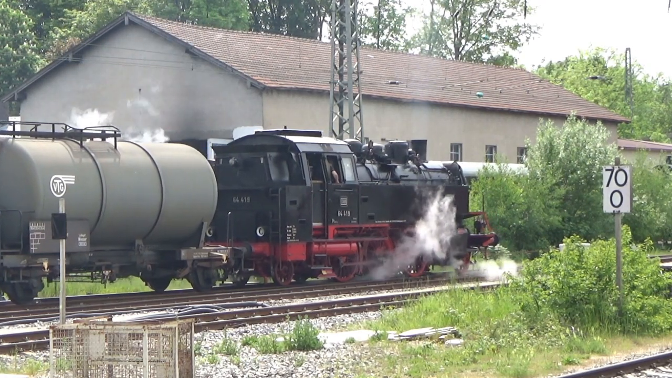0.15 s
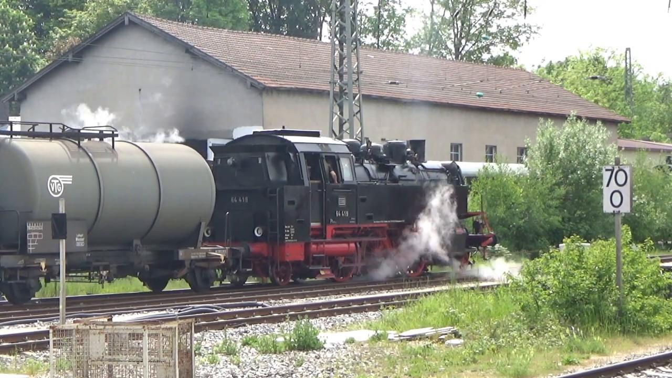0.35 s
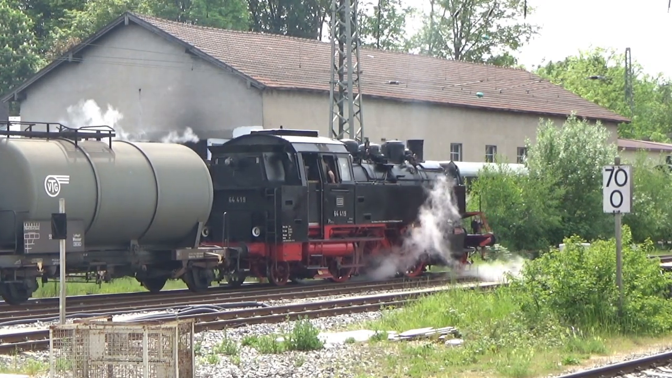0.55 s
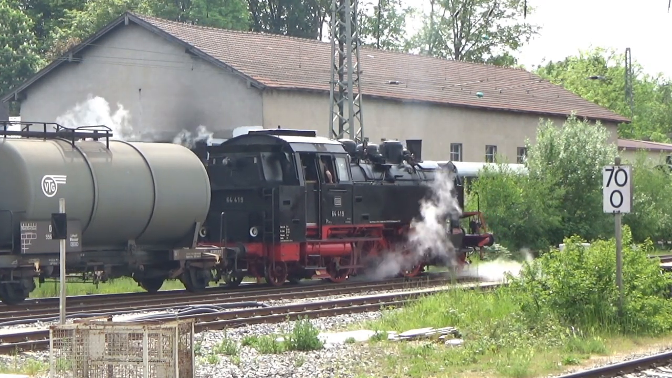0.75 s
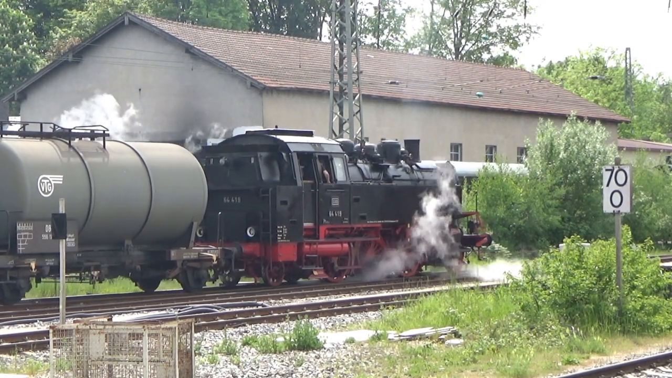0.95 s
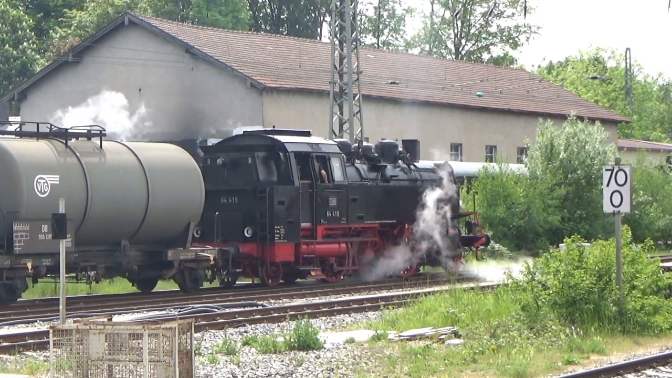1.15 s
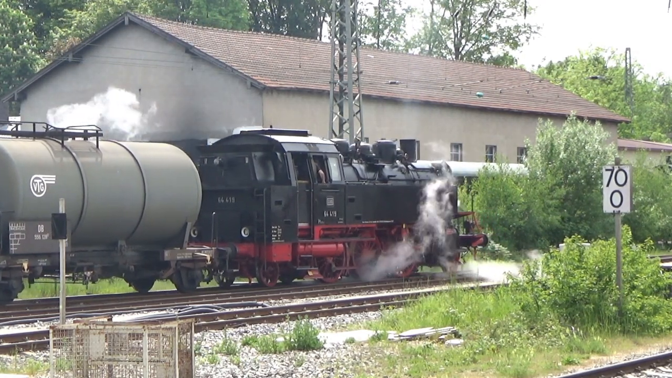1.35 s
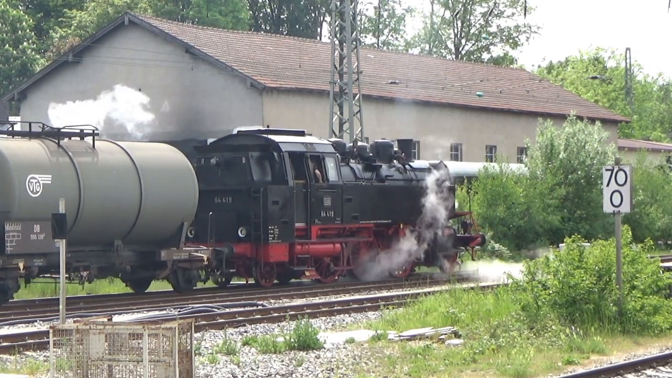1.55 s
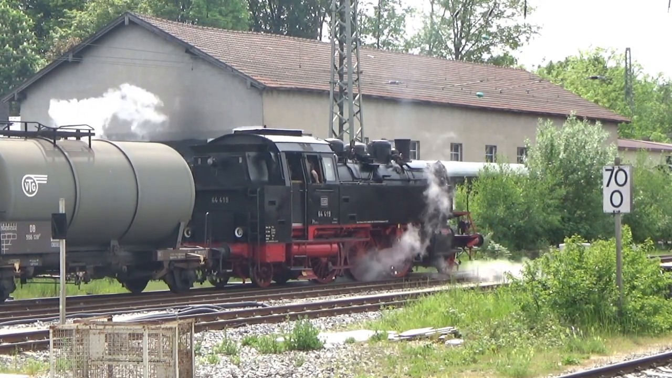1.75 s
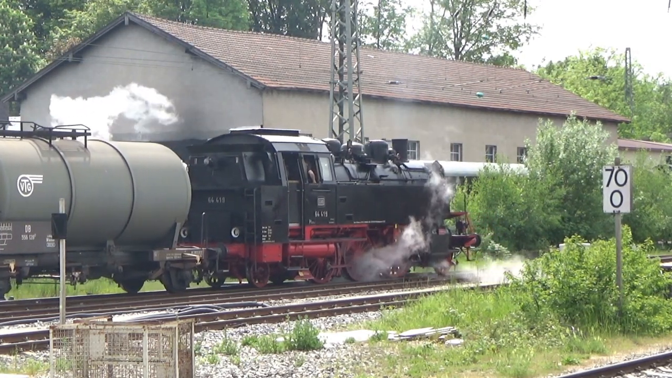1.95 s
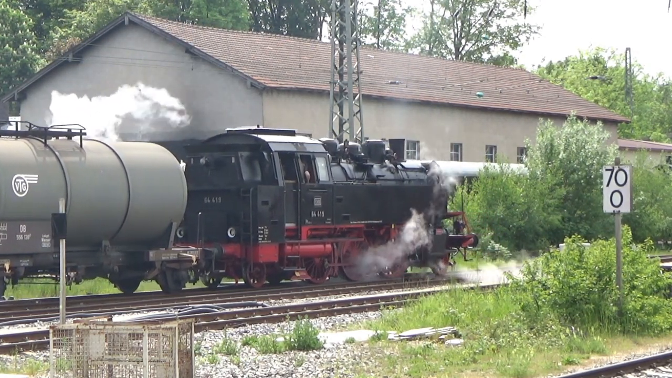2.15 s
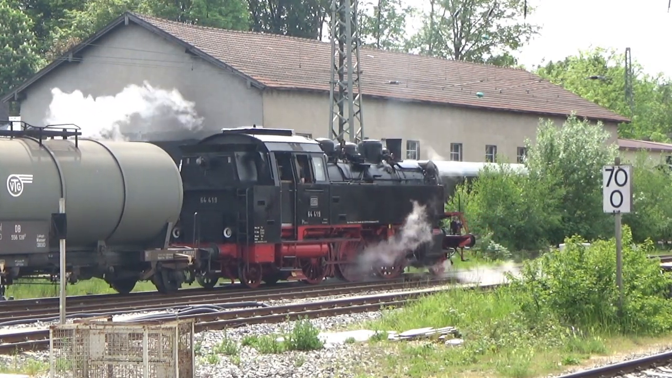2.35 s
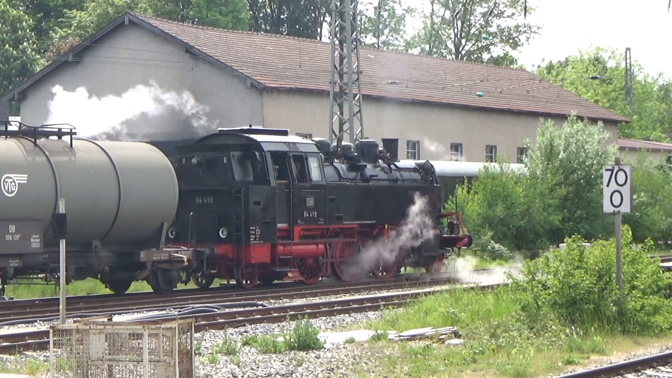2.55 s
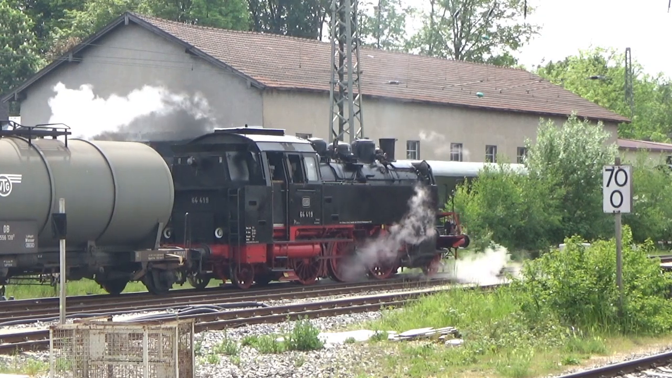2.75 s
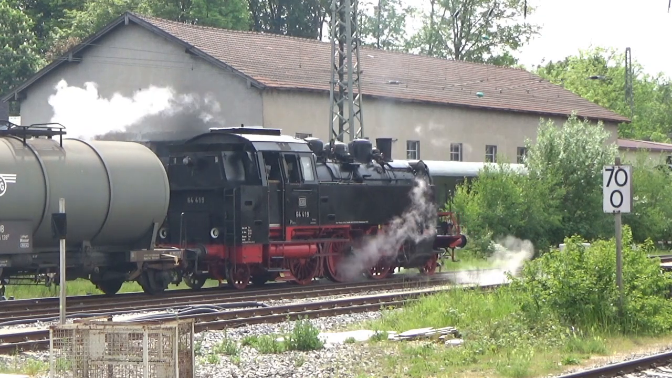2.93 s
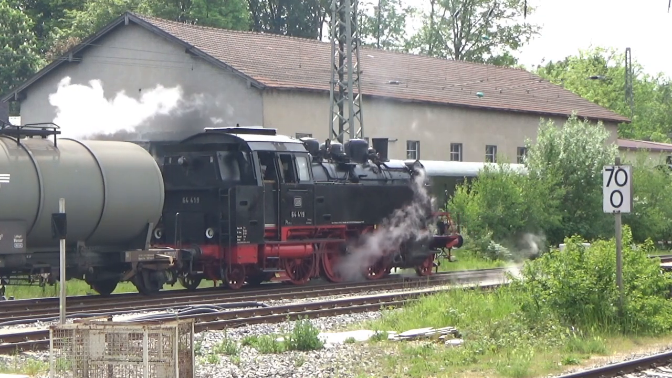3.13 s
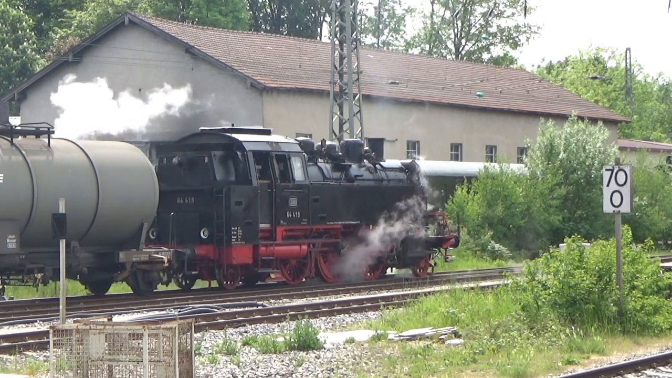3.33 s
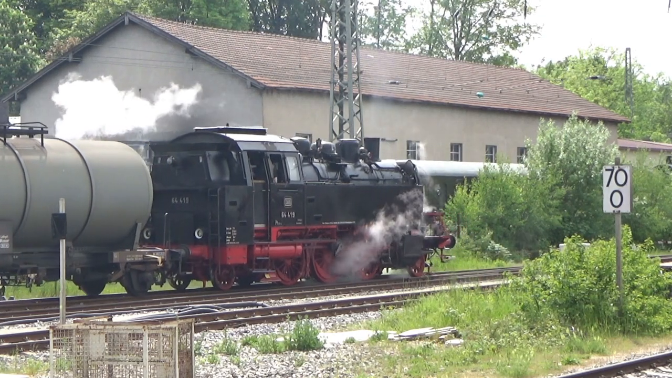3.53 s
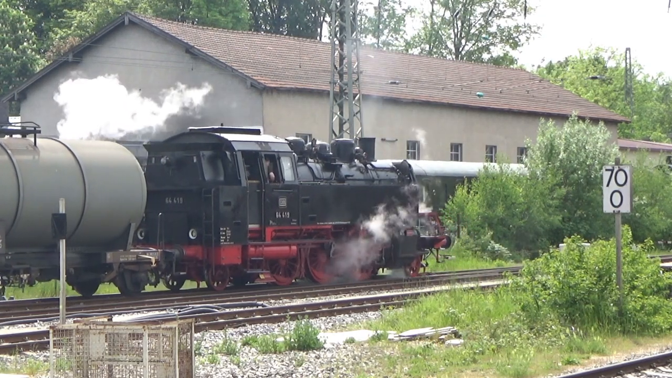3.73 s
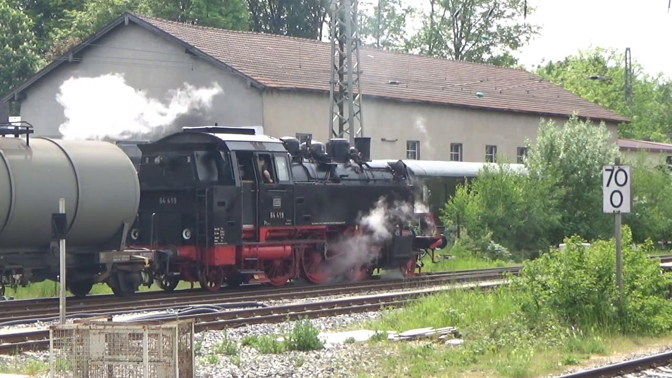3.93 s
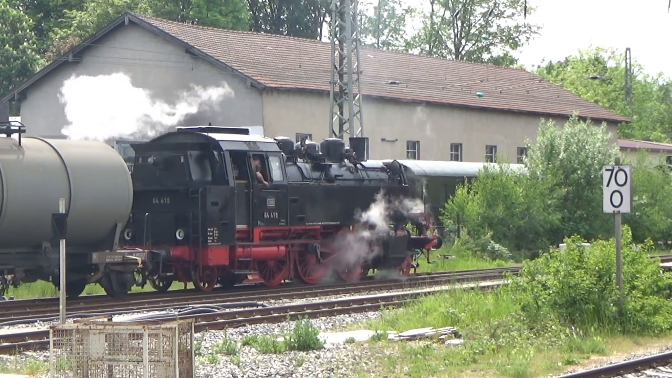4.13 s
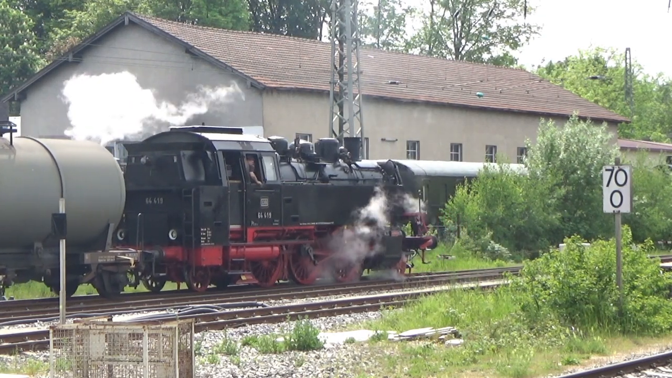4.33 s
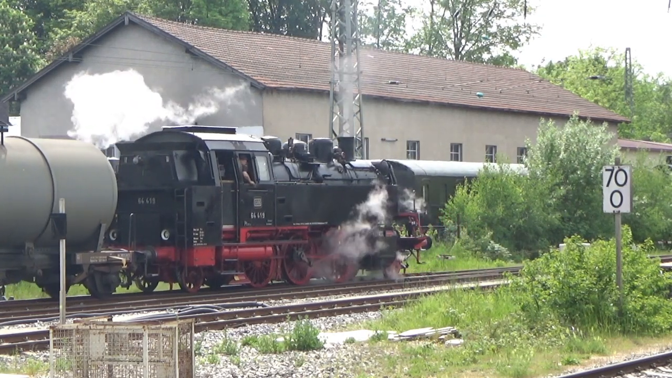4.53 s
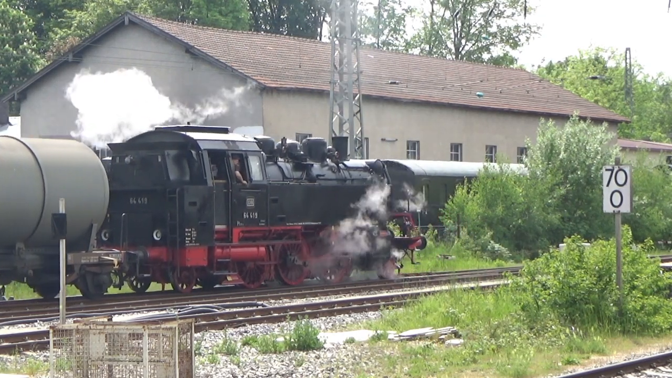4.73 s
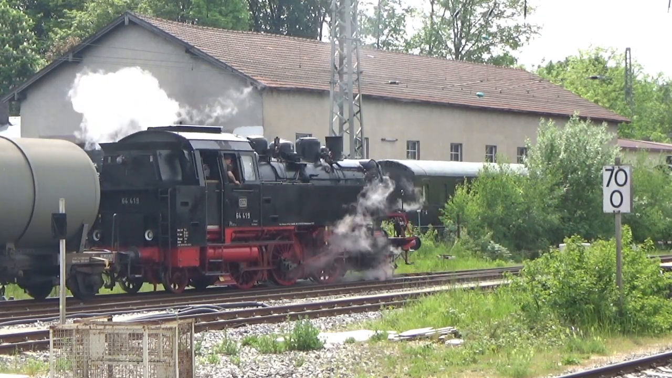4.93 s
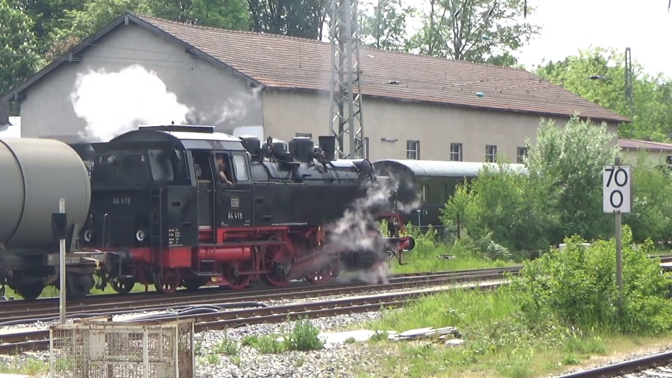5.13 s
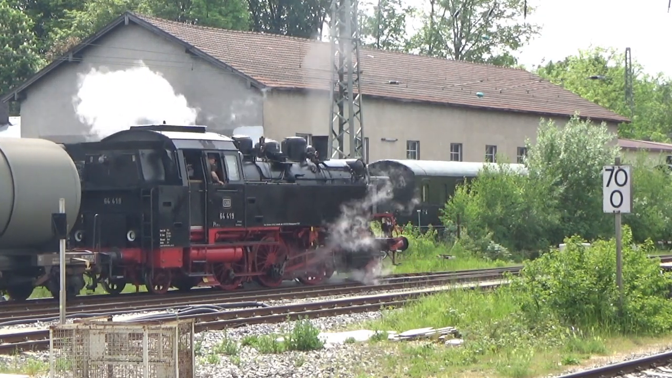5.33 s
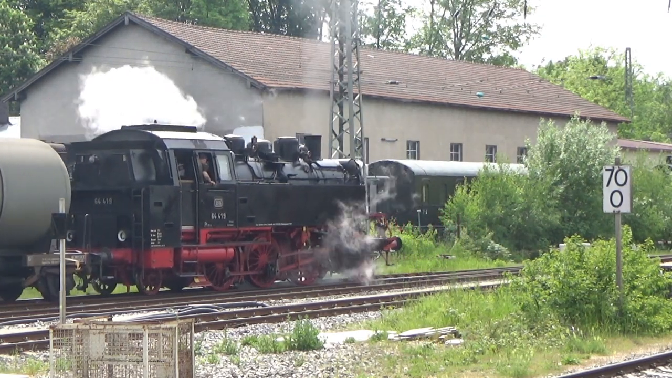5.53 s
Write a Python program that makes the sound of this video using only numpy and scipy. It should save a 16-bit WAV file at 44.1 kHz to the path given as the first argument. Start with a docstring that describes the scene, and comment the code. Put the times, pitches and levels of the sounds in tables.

```python
"""A steam tank locomotive's drain cocks hiss as it pulls slowly away: one blows for 3 s and shuts, later another opens.
The jets are coloured turbulent noise with a broad whistle, a low rush and a near reflection; a softer leak goes on.
Three exhaust beats, each sooner and stronger, are noise swells ringing the chimney; the draught sighs and hums.
A valve sings in narrow-band noise, a wheel groans in wavering sines and the train rolls in low noise.
A long shed and wagons return scattered echoes."""
import sys
import numpy as np
from scipy import signal
from scipy.fft import rfft, irfft
from scipy.io import wavfile
from scipy.ndimage import uniform_filter1d, map_coordinates

SR = 44100
rng = np.random.default_rng(int(sys.argv[2]) if len(sys.argv) > 2 else 0)


def wav_out(sig):
    """Save sig, one row per channel (or a flat mono array), as 16-bit PCM at SR to the path in sys.argv[1]."""
    wavfile.write(sys.argv[1], SR, np.round(np.clip(np.atleast_2d(sig).T, -1, 1) * 32767).astype(np.int16))


N = 246078
TIME = np.arange(N) / SR
BINS = np.fft.rfftfreq(N, 1 / SR)

# first jet, swinging about: t/s, level/dB, whistle f/Hz, whistle level/dB
FIRST_JET = [(0, -18, 9000, 3), (.36, -18.5, 8700, 6), (.44, -17.5, 4900, 2.5), (.7, -16, 4000, 0.5),
             (.97, -18, 8400, 5), (1.25, -18, 6750, 5.5), (1.56, -17.5, 6360, 3), (1.76, -19, 9000, 6.5),
             (2.2, -21, 8250, 9.5), (2.42, -18, 9100, 2), (2.82, -17.5, 9900, 4.5), (3.0, -19, 9600, 0.5)]
# first jet's spectral density: f/Hz, level/dB per Hz
FIRST_COLOUR = [(40, -33.5), (170, -44.5), (450, -50), (600, -35), (950, -21.5), (1400, -18.5), (1650, -12),
                (2300, -7.5), (3000, -3), (4000, 1), (5200, 0), (6300, 1.5), (7500, -4), (9500, -5),
                (11500, -15.5), (15000, -30)]
# low rush under the first jet: t/s, level/dB
FIRST_RUSH = [(0.0, -37.5), (0.33, -39), (0.84, -34.5), (1.45, -40), (1.61, -35), (2.37, -41.5),
              (2.38, -34.5), (2.77, -43.5), (2.95, -42)]
# first jet's side-to-side swing: t/s, left minus right/dB
FIRST_PAN = [(0.0, -3.5), (1.49, -2.5), (1.87, -4), (2.01, -3.5), (2.95, -6)]
FIRST_SHUTS_S, SHUT_DECAY_S = 3.003, 0.026
RUSH_UNDER_DB = 20  # rush band below the whole hiss when there is no extra rush


def first_cock():
    """Steam blows hard, its jet swinging and its whistle wandering, until the cock snaps shut."""
    t = grid()[0]
    level_db, whistle_hz, whistle_db = follow(FIRST_JET, t)
    rush_db = follow(FIRST_RUSH, t)[0] - level_db + RUSH_UNDER_DB
    # offsets the port balance applied later in record()
    right_db = read(PORT_BALANCE, 3800) - follow(FIRST_PAN)[0]
    steam = jet(FIRST_COLOUR, whistle_hz, whistle_db, rush_db, right_db, echo=0.53)
    still_open = np.exp(-np.maximum(TIME - FIRST_SHUTS_S, 0) / SHUT_DECAY_S)
    level = gain_of(follow(FIRST_JET)[0])
    return level * still_open * steam


# second jet's spectral density: f/Hz, level/dB per Hz
SECOND_COLOUR = [(150, -44), (500, -16), (1300, -15.5), (1900, -8.5), (2450, -5.5), (4400, 1), (5600, -3),
                 (6500, 0.5), (7500, -3.5), (9500, -6.5), (12000, -13), (15000, -31)]
SECOND_WHISTLE_HZ, SECOND_WHISTLE_DB = 6840, 2
SECOND_CRACKS_S, SECOND_OPENS_S, OPENING_S = 4.575, 4.73, 0.077  # OPENING_S: length of each step
CRACKED_DB, SECOND_DB, SECOND_GROWTH_DB_PER_S = -33, -26.5, 5
CRACKED_RUSH_DB, OPEN_RUSH_DB = 8.5, -0.4  # condensed water adds rush until blown out
SECOND_RIGHT_DB = 1.9  # right minus left


def second_cock():
    """Opens in two steps on a later piston stroke: wet and dull at first, then dry and slowly growing."""
    rush_opening = ramp(SECOND_OPENS_S, OPENING_S, grid()[0])
    rush_db = CRACKED_RUSH_DB + (OPEN_RUSH_DB - CRACKED_RUSH_DB) * rush_opening
    steam = jet(SECOND_COLOUR, SECOND_WHISTLE_HZ, SECOND_WHISTLE_DB, rush_db, SECOND_RIGHT_DB, echo=0.48)
    growth_db = SECOND_GROWTH_DB_PER_S * np.maximum(TIME - SECOND_OPENS_S, 0)
    level_db = CRACKED_DB + (SECOND_DB - CRACKED_DB) * ramp(SECOND_OPENS_S, OPENING_S) + growth_db
    return gain_of(level_db) * ramp(SECOND_CRACKS_S, OPENING_S) * steam


def jet(colour, whistle_hz, whistle_db, rush_db, right_db, echo):
    """Turbulent steam from a drain cock: a broad whistle and a low rush ride on the hiss."""
    hz = grid()[1]
    whistle = whistle_db * hump(hz, whistle_hz, 0.34)
    rush = rush_db * hump(hz, 1490, 0.64)
    hiss = turbulence(read(colour, hz) + whistle + rush, patchy_db=.6, flutter_db=.15)
    steam = evened(reflected(hiss, echo))
    upper_middle = irfft(rfft(steam) * hump(BINS, 3800, .65), N)
    side_gain = gain_of(right_db * np.array([[-.5], [.5]]))
    return steam + upper_middle * (side_gain - 1)  # only this band is panned


LAG_MS, LAG_MS_PER_S, LONGEST_LAG_MS = 2.955, .083, 3.34  # lag grows as the engine moves on


def reflected(x, strength):
    """A near reflection adds a late, thin copy, combing the hiss into ripples about 320 Hz apart."""
    lag_ms = np.minimum(LAG_MS + LAG_MS_PER_S * TIME, LONGEST_LAG_MS)
    late = np.arange(N) - lag_ms * SR / 1000
    copy = np.array([map_coordinates(side, [late], order=3) for side in x])
    turn = np.exp(1j * np.pi / 4)  # the rough surface shifts the phase
    return x + strength * irfft(rfft(copy) * turn * hump(BINS, 3900, 1.1), N)


# leak's spectral density: f/Hz, level/dB per Hz
LEAK_COLOUR = [(240, -54), (400, -12), (542, -9.5), (734, -8), (921, -8), (1090, -8), (1330, -7.5),
               (1500, -4), (2090, -3.5), (2470, -2.5), (4200, -0.5), (6320, 0.5), (6920, -3.5),
               (9520, -5.5), (15000, -31)]
LEAK_DB, LEAK_PUFF_DB = -38, -47
LULL_FROM_S, LULL_TO_S, LULL_DB, LULL_RAMP_S = 3.25, 3.99, -3, 0.091


def leak():
    """Softer hiss from the cylinder glands: it sags for part of a stroke and puffs with each beat."""
    hiss = turbulence(read(LEAK_COLOUR, grid()[1]), patchy_db=.6, flutter_db=.15)
    sag = ramp(LULL_FROM_S - LULL_RAMP_S / 2, LULL_RAMP_S)
    recovery = ramp(LULL_TO_S - LULL_RAMP_S / 2, LULL_RAMP_S)
    steady = gain_of(LEAK_DB + LULL_DB * (sag - recovery))
    puffs = sum(puff(s, peak_s) for s, _, peak_s, *_ in BEATS)
    return (steady + gain_of(LEAK_PUFF_DB) * puffs) * hiss


# exhaust beats: t/s, level/dB, time to peak/s, chimney pitch factor, chimney ring/dB
BEATS = [(3.73, -42.5, 0.089, 0.97, -2.5), (4.606, -30.5, 0.083, 1, -2.5), (5.34, -28, 0.081, 1.003, 1)]
DRAUGHT_DB, DRAUGHT_END_DB = -63.5, -55.5
PUSH_HZ, PUSH_LAG_S = 170, .025  # deep push: below this f, this much later than the rasp


def exhaust():
    """Each beat is a swell of steam from the blast pipe, its bass last; a soft draught goes on between."""
    out = with_speed(DRAUGHT_DB, DRAUGHT_END_DB, power=0.87) * chimney(pitch=0.99, ring_db=-8.5)
    for s, db, peak_s, pitch, ring_db in BEATS:
        blast = chimney(pitch, ring_db)
        push = irfft(rfft(blast) / (1 + (BINS / PUSH_HZ) ** 6), N)
        rasp = blast - push
        out += gain_of(db) * (puff(s, peak_s) * rasp + puff(s + PUSH_LAG_S, peak_s) * push)
    return out


# exhaust's spectral density: f/Hz, level/dB per Hz
BEAT_COLOUR = [(40, -48), (90, -26), (160, -6.5), (235, -6.5), (365, 0), (450, -16), (600, -1.5),
               (1050, -14), (1600, -19), (3500, -14.5), (8000, -30), (14000, -48)]
# chimney resonances: f/Hz, width/Hz, level/dB
CHIMNEY = [(307, 18, 11.5), (580, 58, -2), (860, 53, -4), (1210, 73, -7.5), (1530, 78, -2.5),
           (1830, 86, -8)]


def chimney(pitch, ring_db):
    """Steam rushing up the chimney excites its resonances."""
    hz = grid(size=2048)[1]
    power = gain_of(read(BEAT_COLOUR, hz)) ** 2
    for mode_hz, width, mode_db in CHIMNEY:
        power = power + (gain_of(mode_db + ring_db) * resonance(hz, mode_hz * pitch, width)) ** 2
    return turbulence(10 * np.log10(power), patchy_db=.5, flutter_db=.3, size=2048)


BEAT_SHARPNESS = 3.94


def puff(s, peak_s):
    """The envelope of a beat: a quick swell and a slower fall."""
    age = np.maximum(TIME - s, 0) / peak_s
    return (age * np.exp(1 - age)) ** BEAT_SHARPNESS


# valve notes, each lasting until the next: start t/s, f/Hz, level/dB
VALVE_NOTES = [(4.28, 2580, -50.5), (4.73, 2426, -42.5)]
VALVE_RISE_S = 0.025


def valve():
    """Steam sings thinly through a valve as narrow-band noise, then drops to a lower, stronger note."""
    hz, out = grid()[1], 0
    for s, note_hz, db in VALVE_NOTES:
        song_db = 20 * np.log10(resonance(hz, note_hz, width=90))
        song = turbulence(song_db, patchy_db=.5, flutter_db=.5)
        taken_over = ramp(s, VALVE_RISE_S)
        out = out * (1 - taken_over) + gain_of(db) * taken_over * song
    return out


# rolling noise's spectral density: f/Hz, level/dB per Hz
ROLLING_COLOUR = [(20, -15), (60, -5), (120, 0), (180, -4.5), (260, 8), (450, -12), (1200, -30),
                  (4000, -60)]
# draught hums in the chimney: middle t/s, level/dB, half length/s
HUMS = [(1.02, -65, 0.13), (1.65, -56.5, 0.065), (3.96, -58, 0.11)]
# wheel groans on the rail: middle t/s, f/Hz, level/dB, half length/s
GROANS = [(0.102, 686, -57.5, 0.085), (0.266, 692, -50, 0.025), (.42, 590, -61, 0.093),
          (0.598, 580, -47, 0.033), (.79, 930, -52, 0.04), (1.018, 980, -50, 0.032)]
ROLLING_DB, ROLLING_END_DB = -78, -57.5
HUM_HZ, HUM_HZ_PER_S = 294, 3.3  # pitch creeps up with the draught


def running_gear():
    """Low noise of the rolling train, with wavering sines for the chimney hum and the groaning wheel."""
    rolling_db = read(ROLLING_COLOUR, grid(size=2048)[1])
    rumble = turbulence(rolling_db, patchy_db=.8, flutter_db=.5, size=2048)
    hum_level = sum(gain_of(db) * swell(s, half_s) for s, db, half_s in HUMS)
    hum = hum_level * tone(HUM_HZ + HUM_HZ_PER_S * TIME, waver=0.019)
    groans = sum(gain_of(db) * swell(s, half_s) * tone(hz, waver=0.018) for s, hz, db, half_s in GROANS)
    return with_speed(ROLLING_DB, ROLLING_END_DB, power=0.99) * rumble + hum + groans


PICKS_UP_S = 3


def with_speed(first_db, end_db, power):
    """A gain that grows as the engine picks up speed."""
    speed = ramp(PICKS_UP_S, TIME[-1] - PICKS_UP_S) ** power
    return gain_of(first_db + (end_db - first_db) * speed)


# yard reverberation: f/Hz, t60/s
YARD_DECAY = [(200, 0.13), (1000, 1), (4000, 0.88), (8000, 0.63), (14000, 0.18)]


def yard(x):
    """Scattered echoes from the shed and the wagons; bass and high treble die soonest, the middle lingers."""
    shared, apart = rng.standard_normal((2, SR)) * (rng.random((2, SR)) < .1)
    after_gap = np.arange(SR) / SR > .012  # s
    taps = (shared + .25 * np.array([apart, -apart])) * after_gap
    hz, t, z = signal.stft(taps, SR, nperseg=256)
    decay = gain_of(-60 * t / read(YARD_DECAY, hz)[:, None])
    tail = signal.istft(z * decay, SR, nperseg=256)[1]
    tail = tail / np.linalg.norm(tail[0])
    lead_in = np.concatenate([x[SR // 2:0:-1], x])  # the steam is already blowing
    return signal.fftconvolve(lead_in[None], tail, axes=1)[:, SR // 2:][:, :N]


# left-right correlation of the noise: f/Hz, likeness/1
LIKENESS = [(30, .95), (80, .99), (300, .988), (550, .89), (1200, .89), (2200, .9), (3500, .92), (9000, .9),
            (10800, .999)]


def turbulence(colour_db, patchy_db, flutter_db, size=512):
    """Coloured stereo noise of rms one, with drifting patches and a flutter shared by all pitches."""
    t, hz = grid(size=size)
    a, b, c, d, patches = rng.standard_normal((5, len(t), len(hz)))
    for _ in range(2):
        patches = uniform_filter1d(uniform_filter1d(patches, size=16, axis=0), size=16, axis=1)
    flutter = uniform_filter1d(rng.standard_normal(t.shape), size=6, axis=0)
    same = np.clip(read(LIKENESS, hz), -1, 1)
    left = a + 1j * b
    right = same * left + np.sqrt(1 - same ** 2) * (c + 1j * d)
    z = np.array([left, right])
    z *= gain_of(colour_db + patchy_db * evened(patches) + flutter_db * evened(flutter))
    noise = signal.istft(z.swapaxes(1, 2), nperseg=size, noverlap=size - size // 4)[1]
    return evened(noise[:, :N])


def tone(hz, waver):
    """A sine whose pitch wavers at random."""
    drift = evened(uniform_filter1d(rng.standard_normal(N), size=800))
    phase = 2 * np.pi * np.cumsum(hz * (1 + waver * drift)) / SR
    return np.sqrt(2) * np.sin(phase)


def resonance(hz, centre_hz, width):
    """The gain of a resonance, one at its centre."""
    return 1 / (1 + ((hz - centre_hz) / width) ** 2)


def hump(hz, centre_hz, octaves):
    """A bell on a log-frequency axis."""
    return np.exp(-.5 * (np.log2((hz + 1) / centre_hz) / octaves) ** 2)


def swell(middle_s, half_s):
    """A bell in time."""
    return np.exp(-.5 * ((TIME - middle_s) / half_s) ** 2)


def ramp(start_s, length_s, t=TIME):
    """Rises straight from zero to one."""
    return np.clip((t - start_s) / length_s, 0, 1)


def gain_of(db):
    """Decibels to amplitude."""
    return 10 ** (np.asarray(db) / 20)


def evened(x):
    """Scales to an rms of one."""
    return x / np.sqrt(np.mean(x ** 2) + 1e-20)


def read(points, hz):
    """Reads a spectrum on a log-frequency axis."""
    f, value = np.transpose(points)
    return np.interp(np.log(hz + 1), np.log(f + 1), value)


def follow(rows, t=TIME):
    """Reads every column of a curve at the times t."""
    s, *columns = np.transpose(rows)
    return [np.interp(t, s, c) for c in columns]


def grid(size=512):
    """Times (a column) and frequencies (a row) of the short-time spectra."""
    hop = size // 4
    return np.arange(N // hop + 5)[:, None] * hop / SR, np.fft.rfftfreq(size, 1 / SR)


def scene():
    """The engine and the echoes of the yard."""
    cocks = first_cock() + second_cock()
    beats = exhaust()
    echoes = yard((gain_of(-15.5) * cocks + gain_of(-16.0) * beats).mean(0))
    return cocks + beats + leak() + valve() + running_gear() + echoes


# level between the ports: f/Hz, left minus right/dB
PORT_BALANCE = [(100, -.6), (300, -.9), (700, -1.7), (1500, -.4), (2700, -3), (4300, -1.8), (6200, -.5),
                (7500, -1), (9200, -.8), (10800, 0)]
# phase between the ports: f/Hz, left lead/rad
PORT_PHASE = [(100, 0), (1200, -.08), (2500, 0), (3700, .25), (6000, .2), (7500, 0), (8800, -.33),
              (10500, 0)]
EDGE_HZ = 15200


def record(dry):
    """Two closely spaced microphone ports, the engine a little to the right; then a low-pass band limit."""
    ports = gain_of(read(PORT_BALANCE, BINS)) * np.exp(1j * read(PORT_PHASE, BINS))
    halves = ports ** np.array([[.5], [-.5]])
    placed = irfft(rfft(dry) * halves, N)
    low_pass = signal.firwin(511, EDGE_HZ, window=("kaiser", 9), fs=SR)
    return signal.oaconvolve(placed, low_pass[None], "same")


dry = scene()
out = record(dry)
wav_out(out)
```